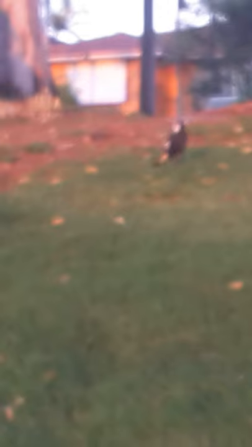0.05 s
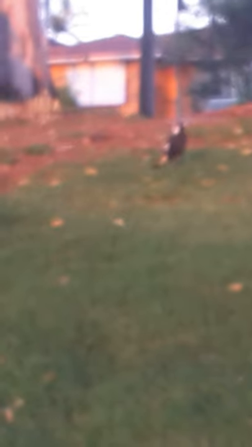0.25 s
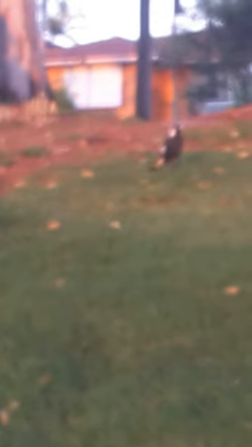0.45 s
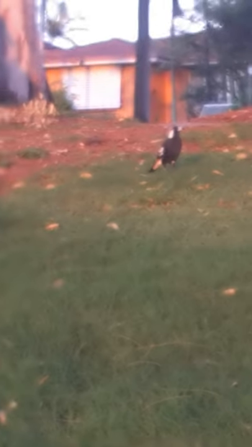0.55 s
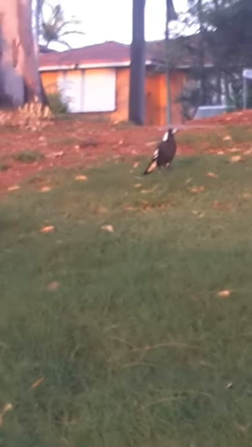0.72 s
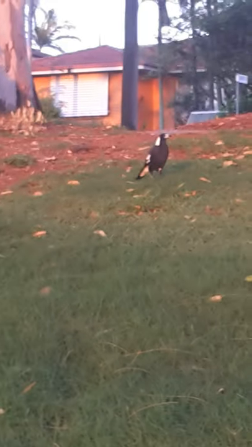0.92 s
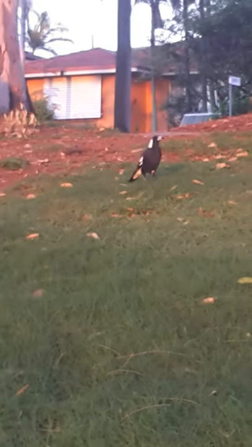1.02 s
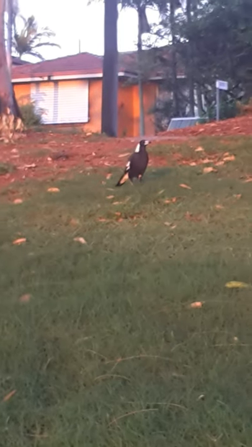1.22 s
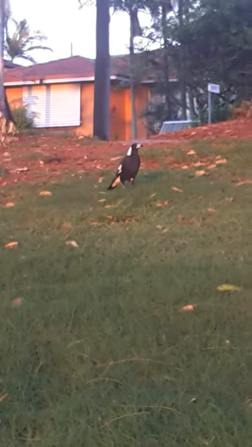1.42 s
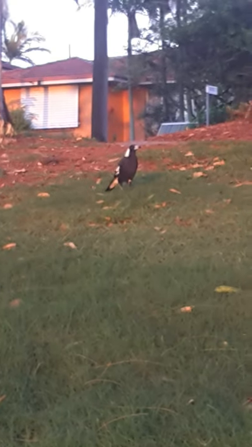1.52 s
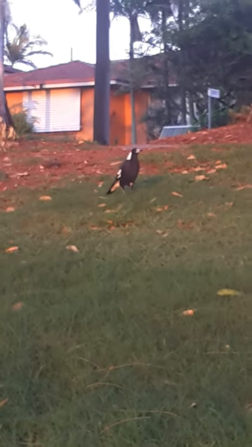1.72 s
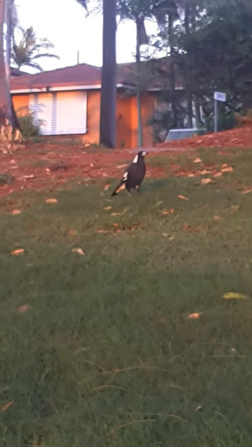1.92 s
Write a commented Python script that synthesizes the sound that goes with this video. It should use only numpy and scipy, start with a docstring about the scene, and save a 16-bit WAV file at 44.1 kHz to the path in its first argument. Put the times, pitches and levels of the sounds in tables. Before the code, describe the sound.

A magpie rasps and squawks outdoors, then whistles upward into a brief warble.

```python
"""A magpie on a suburban lawn: a hoarse rasp, a squawk that cracks between two registers, and a
rising whistle that breaks into a warble, with faint upward chirps between and after the calls.
Its low voice is jittery harmonics and pulsed breath shaped by the throat; its high voice is nearly pure.
Trees and house fronts echo the bird back to the microphone. Tiny ticks sound close by, over
a thin, stuttering high chirr, an airy hiss and distant traffic."""
import sys
import numpy as np
from scipy import signal
from scipy.fft import rfft, irfft
from scipy.io import wavfile

SR = 44100
rng = np.random.default_rng(int(sys.argv[2]) if len(sys.argv) > 2 else 0)


def transcribe(u):
    """Save the signal u as a 16-bit wav file named by the first command-line argument.

    u: samples, shape (n,) or (channels, n), limited to [-1, 1]; the rate is SR.
    q: integer samples, one column per channel.
    """
    v = np.clip(np.atleast_2d(u).T, -1, 1)
    q = np.round(v * 32767).astype(np.int16)
    wavfile.write(sys.argv[1], SR, q)


N = 85995
T = np.arange(N) / SR

# opening rasp (start [s], length [s], first pitch [Hz], last pitch [Hz], level [dB], roughness [0-1])
RASP_NOTES = [(.234, 0.0422, 1337, 1308, -50.5, 0.3), (.278, 0.0535, 1358, 1367, -51.5, 0.58)]
# narrow throat resonances of the rasp (frequency [Hz], gain [dB])
RASP_THROAT = [(700, -37), (1350, -14.5), (2100, -26), (2750, -4.5), (3300, -4.5), (4050, 0), (4600, -4.5),
               (5350, 1), (6300, -14), (7500, -8), (9000, -29), (15000, -41)]
# squawk, low register
# (start [s], length [s], first pitch [Hz], last pitch [Hz], level [dB], roughness [0-1])
CAW_NOTES = [(0.189, 0.038, 1345, 1413, -65.5, 0.22), (.450, 0.01, 1136, 1175, -47.5, .8),
             (.460, 0.037, 1327, 1275, -47.5, 0.18), (.502, .041, 1231, 1183, -43, 0.18),
             (.551, .024, 1130, 1071, -45, 0.42), (.574, 0.0174, 1105, 1098, -42.5, 0.28)]
# throat resonances of the low register (frequency [Hz], gain [dB])
CAW_THROAT = [(700, -13), (1150, -4.5), (1500, -6), (2300, -20.5), (3000, -9.5), (3800, -2.5), (4900, 0.5),
              (6100, -1), (7400, -3.5), (8600, -15.5), (11000, -15), (15000, -32)]
# squawk, high register
# (start [s], length [s], first pitch [Hz], last pitch [Hz], level [dB], octave re fundamental [dB])
SQUEAK_NOTES = [(0.301, 0.0054, 3790, 3580, -43.5, -2), (0.421, 0.016, 3766, 3730, -48, -4.5),
                (0.438, 0.025, 3430, 3380, -43, 6), (0.4938, 0.0088, 3444, 3270, -36, 11),
                (0.5447, 0.0068, 3560, 3760, -34, 19)]
# its upper overtones re the fundamental (third harmonic [dB], fourth harmonic [dB])
SQUEAK_OVERTONES = [-17.5, -26]
# soft slur before the whistle (time [s], pitch [Hz], level [dB])
SLUR_PATH = [(1.462, 2468, -70), (1.475, 2620, -51), (1.478, 3805, -52.5), (1.482, 3650, -56),
             (1.487, 2870, -46), (1.495, 2690, -48.5), (1.515, 2340, -55), (1.524, 2500, -53)]
# rising whistle (time [s], pitch [Hz], level [dB])
RISE_PATH = [(1.523, 3000, -47), (1.527, 4330, -45), (1.539, 4420, -39), (1.545, 4710, -42.5),
             (1.552, 4950, -37.5), (1.561, 5080, -41), (1.570, 5160, -40.5), (1.585, 5130, -37.5),
             (1.590, 5000, -41)]
# the warble it breaks into (time [s], pitch [Hz], level [dB])
WARBLE_PATH = [(1.5885, 4265, -40), (1.598, 4312, -42.5), (1.615, 4232, -38.5), (1.621, 4010, -47.5),
               (1.627, 4070, -45.5), (1.634, 3833, -54), (1.640, 3870, -47)]
# sharp dips in the warble (time [s], depth [share of pitch])
WARBLE_DIPS = [(1.591, 0.031), (1.6001, 0.086), (1.6124, 0.0946), (1.625, 0.157), (1.6342, 0.207)]
# thin notes around the calls (start [s], length [s], first pitch [Hz], last pitch [Hz], level [dB])
THIN_NOTES = [(0.016, 0.035, 2614, 2490, -71), (0.272, 0.075, 4080, 4010, -53.5),
              (0.33, 0.078, 4160, 4040, -64), (1.458, 0.014, 3310, 3480, -58),
              (1.463, 0.01, 4900, 5030, -58)]
# faint upward chirps (start [s], level [dB])
CHIRP_NOTES = [(.618, -56), (1.213, -60.5), (1.836, -59)]
# colour of the sound scattered round the garden (frequency [Hz], gain [dB])
SCATTER_COLOUR = [(1200, -3), (2800, 0), (4200, 4), (5200, 1), (7000, -1), (11000, -6)]
# echoes off the house fronts (delay [s], gain [dB])
WALL_ECHOES = [(0.028, -14), (.073, -15.5)]
# ticks near the microphone (time [s], level [dB])
TICK_HITS = [(.108, -57), (.977, -51), (1.059, -54), (1.228, -56), (1.729, -55)]
# spells of the high chirr (start [s], end [s], level [dB])
CHIRR_SPELLS = [(1.022, 1.052, -65.5), (1.08, 1.141, -65), (1.151, 1.19, -64), (1.212, 1.3, -64),
                (1.309, 1.351, -65.5), (1.36, 1.441, -64), (1.451, 1.704, -62.5), (1.709, 1.771, -63),
                (1.781, 1.863, -62.5), (1.869, 1.914, -63.5), (1.92, 1.932, -62), (1.941, 1.96, -62)]
# noise band of the chirr (frequency [Hz], gain [dB])
CHIRR_BAND = [(8500, -46), (10500, -7), (11700, 2), (13000, 3.5), (14200, -12), (15600, -25)]
# spectrum of the distant traffic (frequency [Hz], gain [dB])
TRAFFIC_COLOUR = [(20, -42), (35, -22), (55, -8), (86, 2), (105, -2.5), (122, 2), (160, -4.5), (250, -6.5),
                  (400, -11.5), (700, -13.5), (1500, -13.5), (2200, -17), (3500, -21), (5000, -26),
                  (9000, -47), (15500, -26)]
# its swell at the microphone (time [s], level [dB])
TRAFFIC_SWELL = [(0, -65.5), (.15, -59), (.35, -57), (.6, -56.5), (.9, -53.5), (1.1, -54), (1.25, -56),
                 (1.55, -56.5), (1.95, -59.5)]
# engine drone (pitch [Hz], level [dB])
ENGINE_TONES = [(87, -69.5), (111, -71.5), (125, -74)]
# spectrum of the airy hiss (frequency [Hz], gain [dB])
HISS_COLOUR = [(1500, -8.5), (3000, -1.5), (4800, 2), (7200, 0.5), (8500, -10), (10500, -11), (12500, -4.5),
               (15500, -17)]
# its rise and fall (time [s], level [dB])
HISS_SWELL = [(0, -66), (.15, -67), (.3, -58.5), (.6, -60.5), (.95, -63), (1.02, -69.5), (1.4, -68),
              (1.95, -70)]

EDGE_S = 0.0024  # attack and release


def magpie_caws():
    """Out on the lawn, the opening rasp and the hoarse parts of the squawk."""
    rasp = hoarse_voice(RASP_NOTES, RASP_THROAT, jitter=0.031, breath=2.7, shimmer_db=0.0)
    return rasp + hoarse_voice(CAW_NOTES, CAW_THROAT, jitter=0.0506, breath=1.6, shimmer_db=1.5)


def hoarse_voice(notes, throat, jitter, breath, shimmer_db):
    """Jittery harmonics and turbulence pulsed once a cycle, both through the bird's throat."""
    out = np.zeros(N)
    for start, length, first, last, db, rough in notes:
        unsteady = 1 + jitter * rough * wander(520) + 0.0063 * wander(89.3)
        hz = glide(start, length, first, last) * unsteady
        phase = phase_of(hz)
        voiced = unit(sum(colour(k * hz, throat) * np.cos(k * phase) for k in range(1, 12)))
        air = unit(shaped(rng.standard_normal(N) * (1 + np.cos(phase)), throat))
        voice = (voiced + breath * rough * air) * undb(shimmer_db * wander(140))
        out += unit(voice) * undb(db) * gate(start, length)
    return out


def magpie_squeaks():
    """The voice flips to a high, nearly pure register whose octave rings in the throat."""
    out = np.zeros(N)
    for start, length, first, last, db, octave_db in SQUEAK_NOTES:
        hz = glide(start, length, first, last)
        voice = tone(hz, [0, octave_db, *SQUEAK_OVERTONES], jitter=0.0096, shimmer_db=2.3)
        out += voice * undb(db) * gate(start, length)
    return out


def magpie_whistle():
    """A soft slur, then a clean rise."""
    slur = tone(curve(SLUR_PATH), [0, -16], jitter=0.026, shimmer_db=3.5)
    rise = tone(curve(RISE_PATH), [0, -15], jitter=0.0024, shimmer_db=2.9)
    return slur * path_level(SLUR_PATH) + rise * path_level(RISE_PATH)


def magpie_warble(dip_width_s=0.00179, octave_db=-11, growth_db_per_s=246):
    """A note with sharp dips; its octave grows as the pitch sinks toward the throat resonance."""
    dips = sum(depth * np.exp(-((T - time) / dip_width_s) ** 2) for time, depth in WARBLE_DIPS)
    phase = phase_of(curve(WARBLE_PATH) * (1 - dips) * (1 + 0.0167 * wander(654)))
    start, end = WARBLE_PATH[0][0], WARBLE_PATH[-1][0]
    octave = undb(octave_db + growth_db_per_s * (np.clip(T, start, end) - start))
    voice = (np.sin(phase) + octave * np.sin(2 * phase)) * np.sqrt(2 / (1 + octave ** 2))
    return voice * undb(0.92 * wander(270)) * path_level(WARBLE_PATH)


def thin_notes():
    """Quiet, slightly unsteady whistles around the calls."""
    out = np.zeros(N)
    for start, length, first, last, db in THIN_NOTES:
        voice = tone(glide(start, length, first, last), [0], jitter=0.0111, shimmer_db=4.5)
        out += voice * undb(db) * gate(start, length)
    return out


def chirps(length_s=0.033, from_hz=2330, to_hz=3840):
    """Short notes, faint at the microphone, that bend upward ever faster."""
    out = np.zeros(N)
    for start, db in CHIRP_NOTES:
        hz = from_hz + (to_hz - from_hz) * np.clip((T - start) / length_s, 0, 1) ** 1.8
        out += tone(hz, [0, -22], jitter=0.0096, shimmer_db=4.5) * undb(db) * gate(start, length_s)
    return out


def garden(direct):
    """The direct sound, near scatter from ground and trunks, a long faint tail and two wall echoes."""
    near = scatter(direct, t60_s=0.18, db=-9.5, rise_s=0.0028)
    far = scatter(direct, t60_s=0.87, db=-18, rise_s=0.02)
    reflected = shaped(direct, SCATTER_COLOUR)
    walls = sum(undb(db) * np.interp(T - delay, T, reflected, left=0) for delay, db in WALL_ECHOES)
    return direct + near + far + walls


def scatter(direct, t60_s, db, rise_s):
    """Dense reflections that build up at the microphone and die away."""
    tail = noise(SCATTER_COLOUR) * np.exp(-np.log(1000) * T / t60_s) * (1 - np.exp(-T / rise_s))
    return undb(db) * signal.fftconvolve(direct, tail / np.linalg.norm(tail))[:N]


def close_ticks(decay_s=0.0029):
    """Tiny bright clicks close to the microphone."""
    bursts = sum(undb(db) * (T >= time) * np.exp(-np.abs(T - time) / decay_s) for time, db in TICK_HITS)
    return noise([(1000, -21), (5000, 7), (15000, 8)]) * bursts


def high_chirr(from_hz=14600, to_hz=12400, settle_s=0.29, whine_width_hz=450, throb_hz=80):
    """A very high, throbbing chirr in spells; its noisy whine sinks and settles."""
    hz = to_hz + (from_hz - to_hz) * np.exp(-np.maximum(T - CHIRR_SPELLS[0][0], 0) / settle_s)
    band = noise(CHIRR_BAND)
    whine = unit(wander(whine_width_hz) * np.sin(phase_of(hz)))
    throb = 1 + 0.56 * np.sin(phase_of(throb_hz * (1 + 0.32 * wander(39))))
    spells = sum(undb(db) * gate(start, end - start) for start, end, db in CHIRR_SPELLS)
    return unit((band + whine) * throb) * spells


def distant_traffic():
    """Traffic far from the lawn: a swelling rumble and a wavering engine drone."""
    drone = sum(undb(db) * tone(hz * (1 + 0.0304 * wander(13.2)), [0], jitter=0.023, shimmer_db=0.5)
                for hz, db in ENGINE_TONES)
    return drone + noise(TRAFFIC_COLOUR) * undb(curve(TRAFFIC_SWELL) + 1.03 * wander(29))


def airy_hiss():
    """A faint, flickering hiss behind everything."""
    return noise(HISS_COLOUR) * undb(curve(HISS_SWELL) + 1.3 * wander(25))


def tone(hz, harmonics_db, jitter, shimmer_db):
    """Harmonics with slightly unsteady pitch (jitter) and level (shimmer), at unit RMS."""
    phase = phase_of(hz * (1 + jitter * wander(580)))
    harmonics = sum(undb(db) * np.sin(k * phase) for k, db in enumerate(harmonics_db, 1))
    return unit(harmonics * undb(shimmer_db * wander(120)))


def glide(start, length, first_hz, last_hz):
    """A straight slide in pitch."""
    return np.interp(T, [start, start + length], [first_hz, last_hz])


def gate(start, length):
    """Quick attack, hold, quick release."""
    return np.clip(np.minimum(T - start, start + length - T) / EDGE_S, 0, 1)


def curve(rows, column=1):
    """One column of a table, joined by straight lines in time."""
    rows = np.array(rows)
    return np.interp(T, rows[:, 0], rows[:, column])


def path_level(path):
    """Amplitude along a note's path, silent outside it."""
    start, end = path[0][0], path[-1][0]
    return undb(curve(path, column=2)) * gate(start, end - start)


def colour(hz, spectrum):
    """Gain at hz of a (frequency [Hz], gain [dB]) spectrum."""
    freqs, db = np.array(spectrum).T
    return undb(np.interp(np.log(hz + 1), np.log(freqs), db))


def shaped(x, spectrum):
    return irfft(rfft(x) * colour(np.fft.rfftfreq(N, 1 / SR), spectrum), N)


def noise(spectrum):
    return unit(shaped(rng.standard_normal(N), spectrum))


def wander(rate_hz):
    """Smooth random drift up to about rate_hz, at unit RMS."""
    freqs = np.fft.rfftfreq(N, 1 / SR)
    return unit(irfft(rfft(rng.standard_normal(N)) * np.exp(-(freqs / rate_hz) ** 2), N))


def phase_of(hz):
    return 2 * np.pi * np.cumsum(hz) / SR


def undb(db):
    return 10 ** (np.asarray(db) / 20)


def unit(x):
    return x / np.sqrt(np.mean(x ** 2))


def scene():
    """One microphone on the lawn; only the calls carry the garden's echo."""
    calls = magpie_caws() + magpie_squeaks() + magpie_whistle() + magpie_warble()
    calls += thin_notes() + chirps()
    return (garden(calls) + high_chirr() + close_ticks() + distant_traffic() + airy_hiss())[None]


def record(dry):
    """The microphone channel opens after a moment and cuts the top of the treble."""
    opens_s, top_hz = 0.018, 15600
    fade_in = np.clip((T - opens_s) / EDGE_S, 0, 1)
    lowpass = signal.ellip(10, .2, 80, top_hz, fs=SR, output="sos")
    return signal.sosfilt(lowpass, dry * fade_in)


dry = scene()
out = record(dry)
transcribe(out)
```